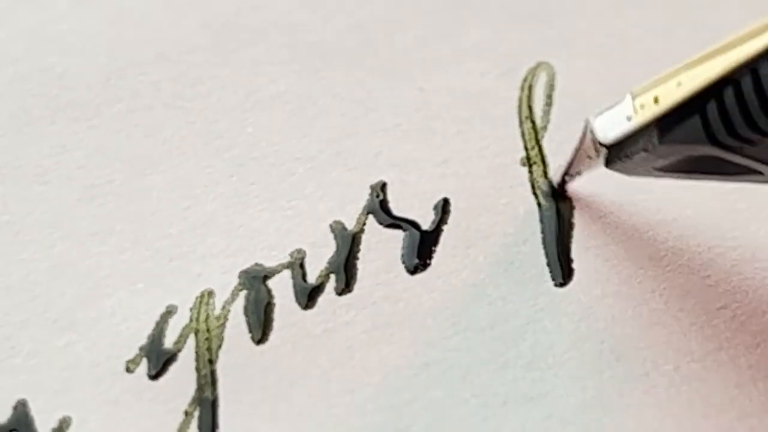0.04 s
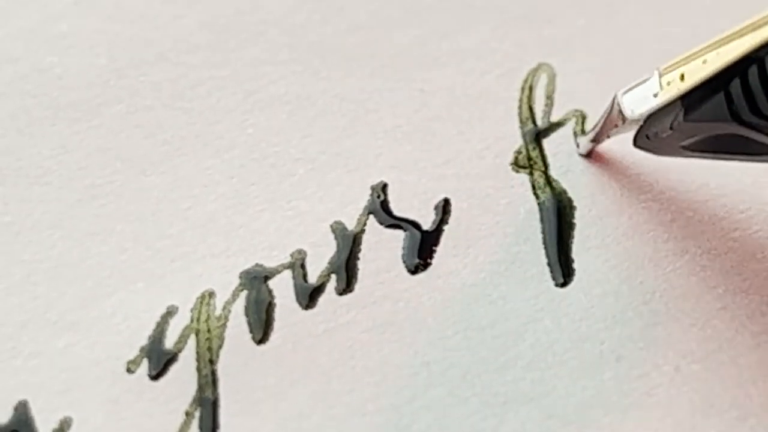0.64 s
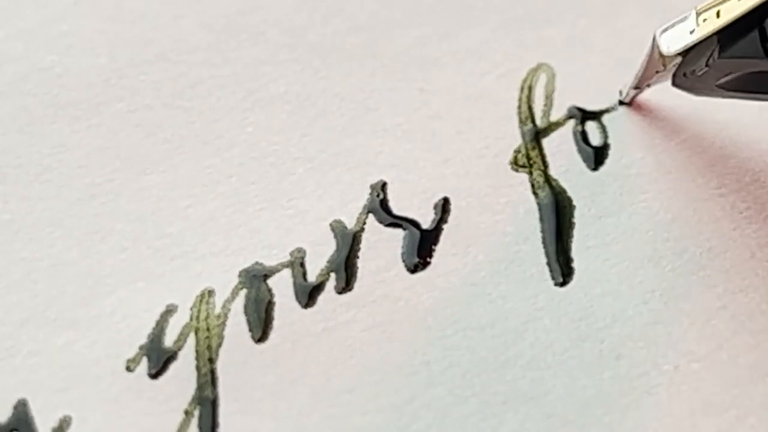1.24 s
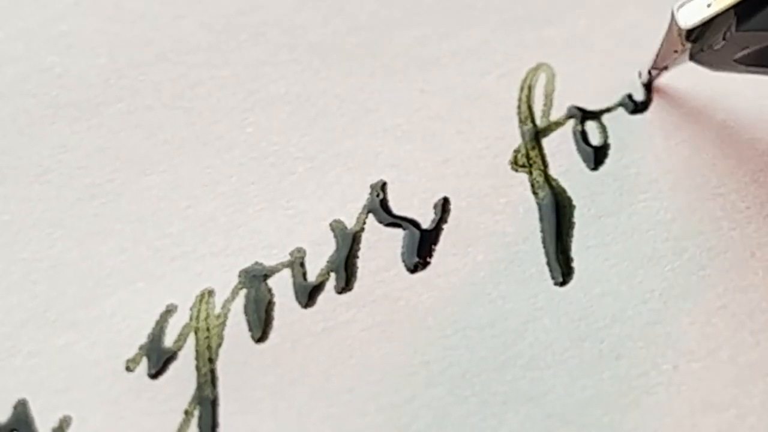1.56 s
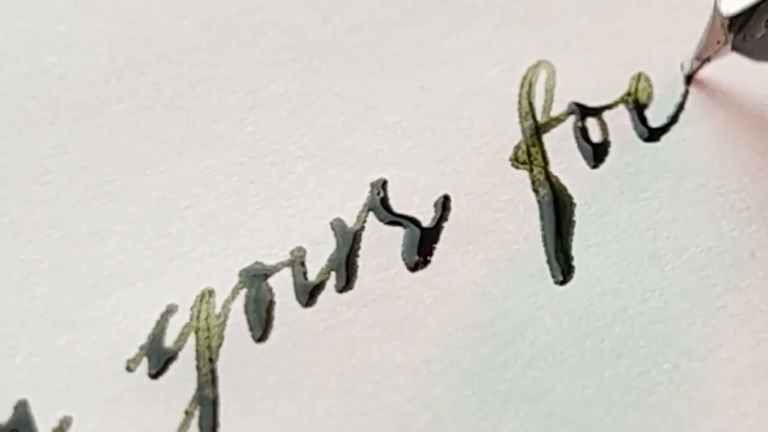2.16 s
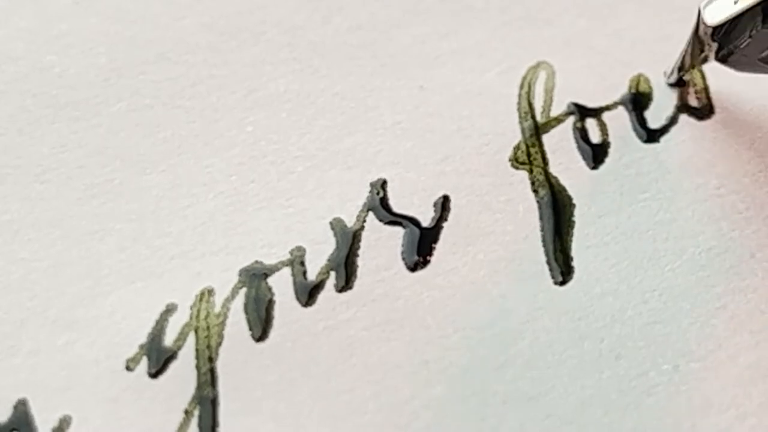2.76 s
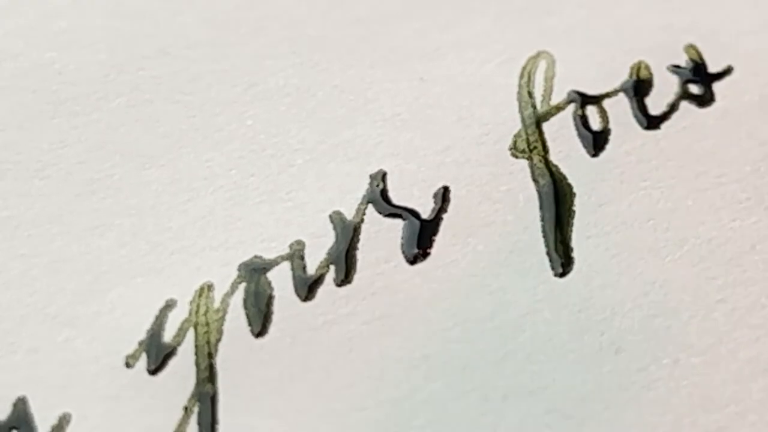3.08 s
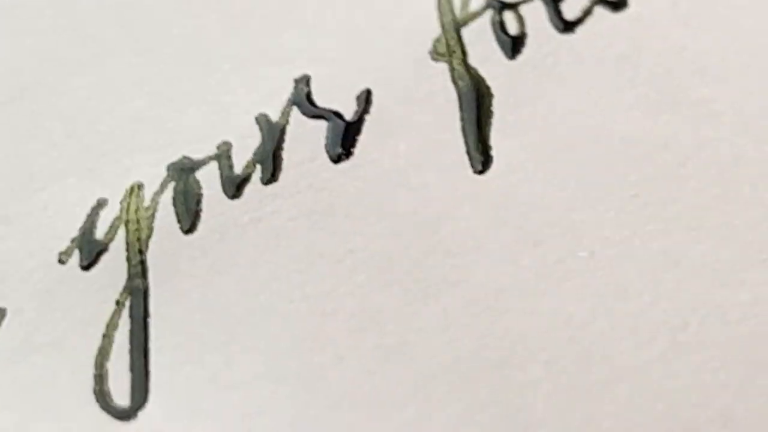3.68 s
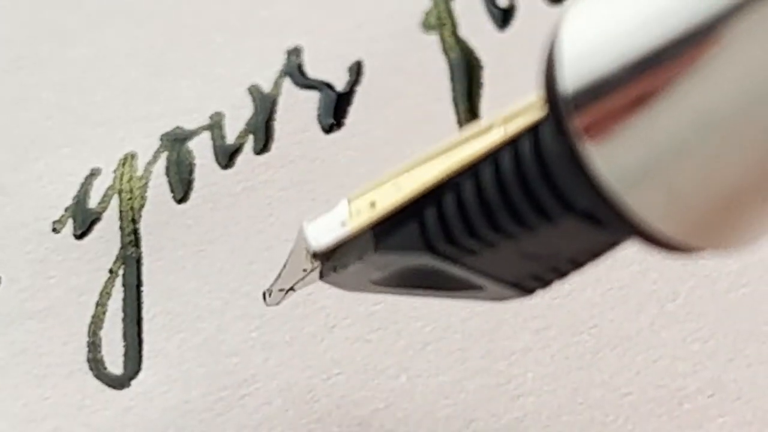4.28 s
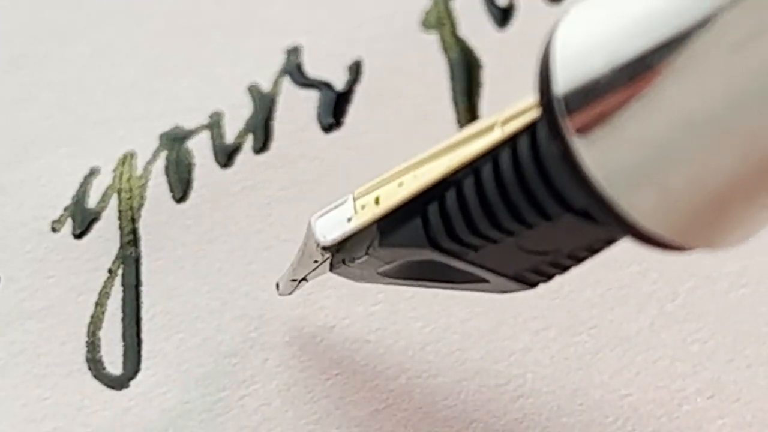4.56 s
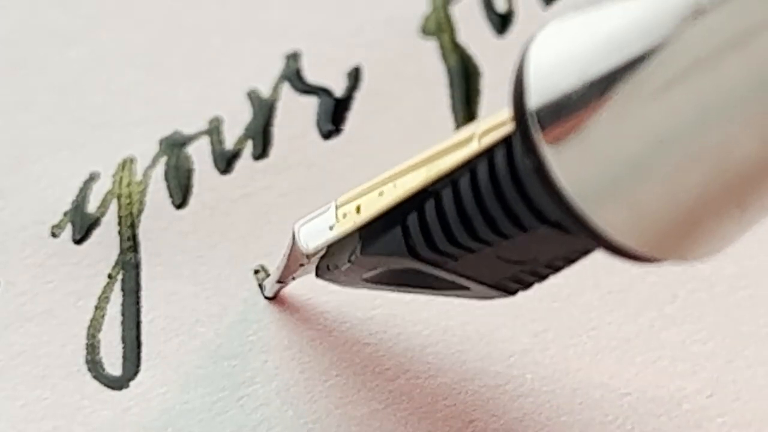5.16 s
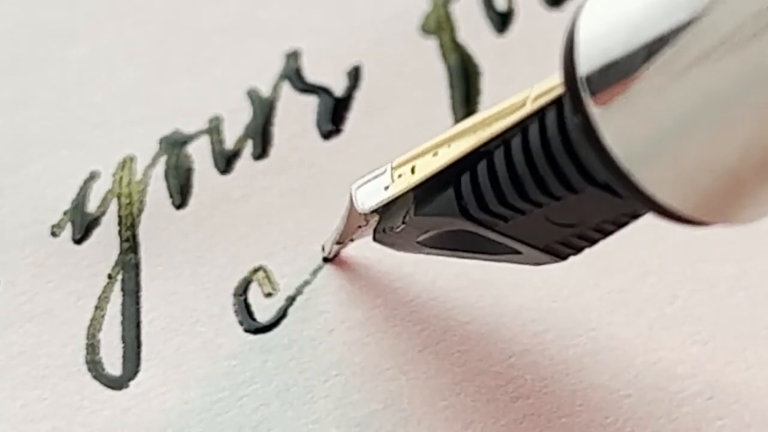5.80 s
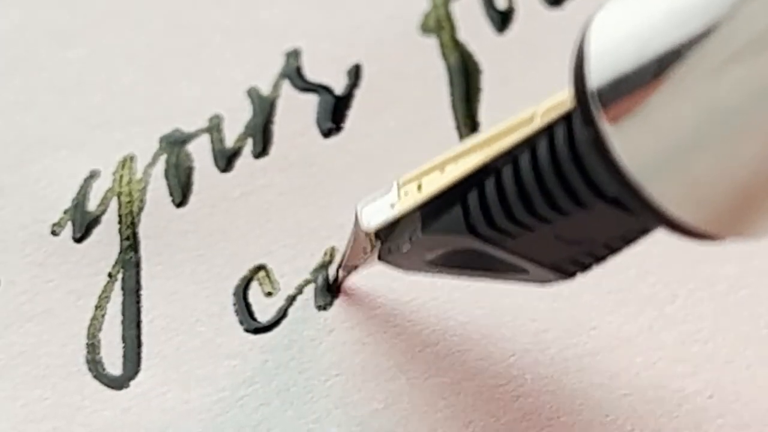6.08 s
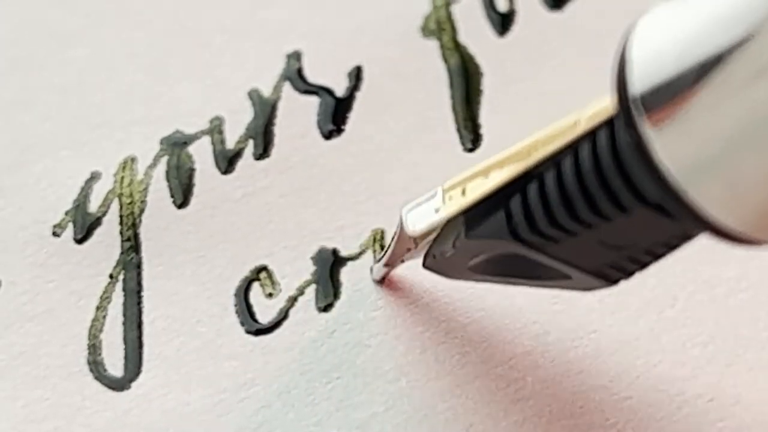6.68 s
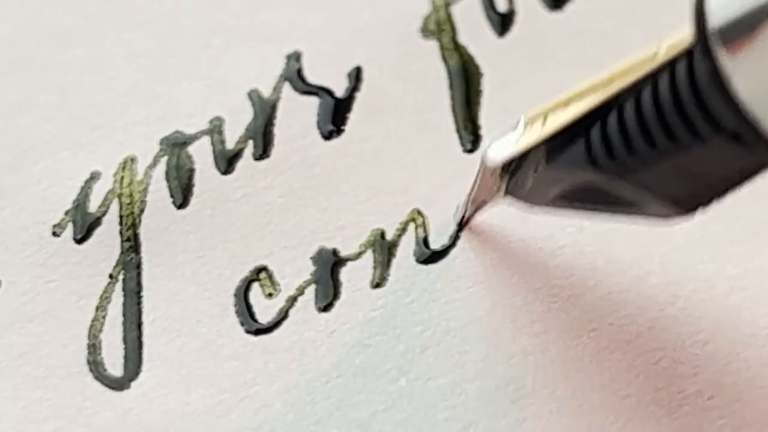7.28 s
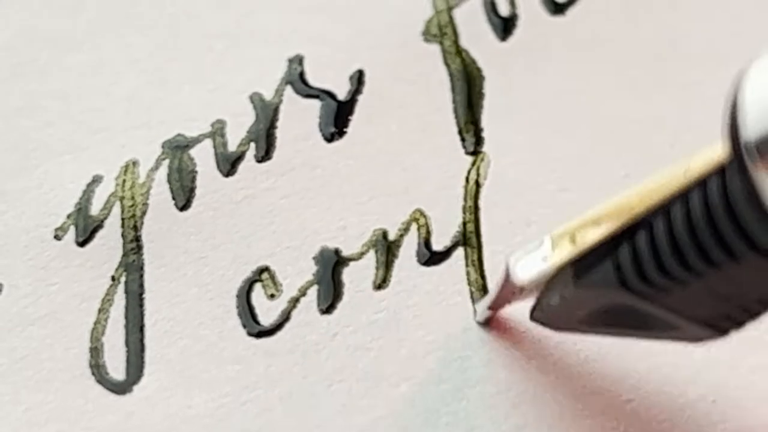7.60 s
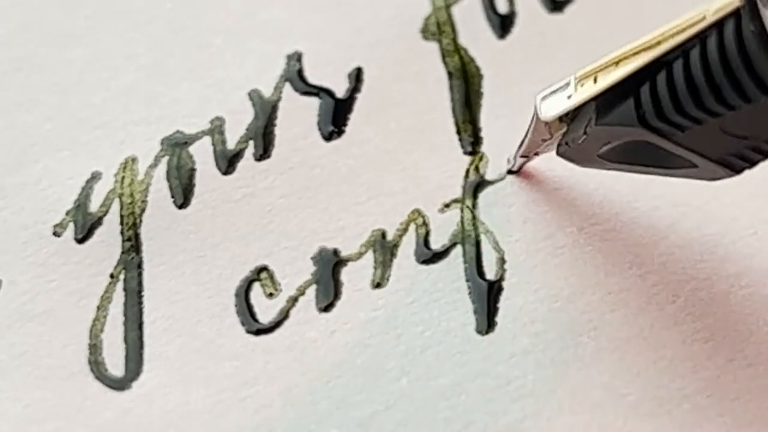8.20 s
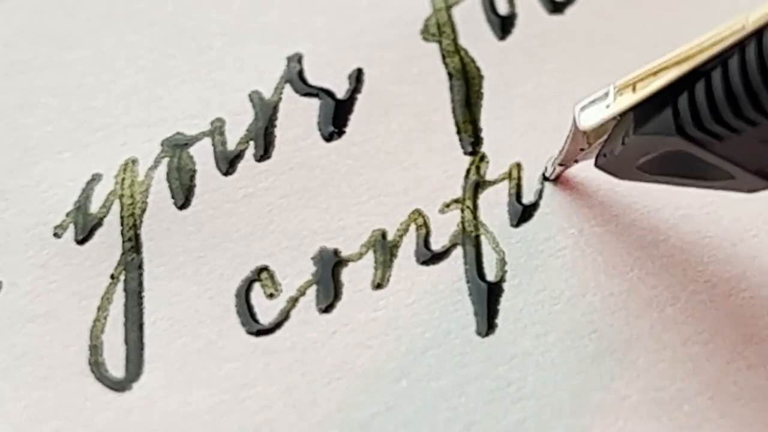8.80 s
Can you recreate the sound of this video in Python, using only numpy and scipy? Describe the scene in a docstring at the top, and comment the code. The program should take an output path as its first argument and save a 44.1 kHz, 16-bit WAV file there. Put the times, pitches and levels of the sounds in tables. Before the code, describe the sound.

A fountain pen writes on textured paper, very close, in a quiet, dry room with faint hiss and low rumble underneath. From the start to about 3 seconds, short rasping downstrokes alternate with softer hissing strokes and brief gaps. The nib ticks near 0.8 and 1.5 seconds, and a stronger scratch with a tiny squeak comes at 2.1. Around 3.4 the hand shifts with a dull rumble, and the sheet slides with a bright swish until 3.9. The hand settles softly at about 4.3. Faint touches of the nib follow, and writing resumes from 5.4 seconds, with scratches and ticks near 6.1, 6.8 and 7.2 and low hand rubbing around 6.4 and 8.1. The sharpest tick lands at 7.7 with a firm rasp. Tiny squeaks dot the later strokes, and a last scratch and tick come at 9 seconds.

```python
"""A flexible fountain pen writes two words on textured paper, close by in a quiet room.
Friction is the exciting force: fibres snap past the nib, and the resonances of pen and pad colour it.
Pressed downstrokes rasp and ring, light upstrokes hiss, and the nib ticks, jerks and squeaks.
Between strokes the hand shifts with a dull rumble, and once the sheet slides along the desk.
A faint hiss and a low murmur lie underneath."""
import sys
import numpy as np
from scipy import signal
from scipy.fft import rfft, irfft, next_fast_len
from scipy.io import wavfile

SR = 44100
rng = np.random.default_rng(int(sys.argv[2]) if len(sys.argv) > 2 else 0)


def wrap_up_sound(samples):
    """Save the sound to the file named by the first command line argument, as 16-bit audio."""
    columns = np.atleast_2d(samples).T
    # keep every value between -1 and 1, then stretch to whole-number steps
    tamed = np.clip(columns, -1, 1)
    steps = np.round(tamed * 32767).astype(np.int16)
    wavfile.write(sys.argv[1], SR, steps)


N = 399096
SIZE = 2 * next_fast_len(N // 2 + SR // 2)
HZ = np.maximum(np.arange(SIZE // 2 + 1) * SR / SIZE, 1)
TIME = np.arange(N) / SR
AGE = TIME[:SR]   # time since the onset of an event
LOW_BAND, PAD_BAND, NIB_BAND = (70, 250), (900, 3000), (4000, 9000)   # reference bands for levels, f/Hz

# Spectral envelopes of noise: f/Hz, relative level/dB
AIR_SPECTRUM = [(400, 14.5), (620, 17.5), (1000, 8.5), (1500, 5), (2200, 6.5), (4000, 1), (8000, 1),
                (10000, -5.5), (12300, -2.5), (13500, -16.5)]
MURMUR_SPECTRUM = [(36, 0), (52, 9.5), (75, 3), (110, 2), (200, -4.5), (420, -13.5)]
SHEET_SPECTRUM = [(700, -10), (2000, -9.5), (3600, -19.5), (5200, 4.5), (8500, -1), (9500, -6.5),
                  (13000, -11), (15200, -13)]
SKIMMED_PAD_SPECTRUM = [(70, 22.5), (130, 19), (300, 15.5), (420, 8.5), (600, 6.5), (1100, -8.5),
                        (1400, -2), (2500, 0), (3300, -8.5), (5000, -76.5)]
NIB_SPECTRUM_WORD_1 = [(3300, -15.5), (4200, -11.5), (5000, -2), (5600, 4.5), (6400, -20), (7000, -11.5),
                       (8400, -19), (9200, -24), (10200, -20.5), (15200, -25)]
NIB_SPECTRUM_WORD_2 = [(3000, 0), (4300, -4), (5300, 6), (7200, 7), (8500, -3.5), (9300, -6.5), (10500, -3),
                       (12000, -6.5), (13500, -17.5), (15200, -10.5)]
# Normal modes of the desk, of pen and pad, and of the nib: f/Hz, bandwidth/Hz, relative level/dB
DESK_MODES_SHIFTING = [(53.4, 7.9, -7.5), (94.5, 20, -7.5), (135.5, 9.5, 0), (162, 110, -18),
                       (200.8, 21.2, -11.5)]
DESK_MODES_SETTLING = [(99.3, 11.2, 0), (153, 37, -13), (213, 22, -7.5)]
PEN_PAD_MODES = [(139, 92, 5), (298, 39, 10), (431.5, 54, -1.5), (555, 140, -3), (780, 150, -7),
                 (1049, 33, -8.5), (1402, 53, -8.5), (1830, 200, -7.5), (2086, 210, -5), (2786, 100, -8)]
NIB_MODES_WORD_1 = [(4300, 180, -16.5), (4570, 1140, -1), (5160, 330, 8), (5590, 320, 10), (7340, 310, -25),
                    (7850, 330, -7.5), (10000, 1400, -12), (14800, 3000, -23)]
NIB_MODES_WORD_2 = [(4030, 250, 4), (4540, 680, -62), (5470, 840, 7.5), (6960, 340, 2.5), (8240, 540, -0.5),
                    (9700, 570, -5), (11900, 720, -13), (15000, 1800, -12)]
# Phase lead of the left channel over the right: f/Hz, phase/rad
PHASE_LEAD = [(20, 0), (850, .4), (1150, -.6), (1750, -.3), (2900, .5), (5000, .4), (6200, 0), (8650, 0),
              (9100, -1.5), (10150, -np.pi), (11800, -2 * np.pi), (12500, -2 * np.pi), (13650, -3 * np.pi),
              (15300, -4 * np.pi)]

# Event levels below are relative within each column.
# Shifts of the hand: t/s, duration/s, rumble level/dB, rub level/dB, initial upper edge of the rub f/Hz
HAND_MOVES = [(2.654, 0.075, -49.5, -62, 200), (3.407, 0.24, -38, -52.5, 344),
              (6.379, 0.31, -36, -43.5, 300), (7.489, 0.14, -50.5, -50.5, 510),
              (8.087, 0.29, -37, -46.5, 447)]
# Envelope of the sliding sheet: t/s, level/dB
SHEET_ENVELOPE = [(3.485, -87), (3.497, -44), (3.577, -63), (3.671, -53), (3.885, -79), (3.9, -92)]
# The nib lands or catches on a fibre: t/s, pad level/dB, nib level/dB
NIB_IMPACTS = [(0.786, -31, -47), (0.802, -32, -38), (0.809, -31, -49), (1.526, -26.5, -36),
               (2.917, -44.5, -40.5), (5.428, -42, -51), (6.081, -26, -36), (6.832, -25.5, -38.5),
               (6.859, -50, -44), (7.238, -41, -53), (7.725, -23.5, -36.5), (7.738, -16, -13.5),
               (9.017, -33, -40)]
# The nib jerks free of a fibre: t/s, level/dB
NIB_JERKS = [(.217, -63), (0.596, -62.5), (0.623, -64), (0.648, -62.5), (0.694, -55.5), (1.028, -59),
             (1.976, -60.5), (2.003, -61), (5.424, -57), (5.605, -55.5), (5.914, -59), (6.327, -64),
             (6.639, -62.5), (6.674, -59.5), (6.705, -62.5), (7.113, -59.5), (7.493, -58), (7.646, -51.5),
             (8.33, -55.5)]
# Peaks of the squeaks: t/s, level/dB
NIB_SQUEAKS = [(2.127, -43.5), (4.831, -70), (5.187, -67), (5.622, -56), (6.87, -55.5), (7.295, -38.5),
               (7.776, -42.5), (8.522, -50), (9.03, -39.5)]
# Light strokes: t/s, duration/s, pad level/dB, nib level/dB, bass lift/dB
LIGHT_STROKES = [(0.032, 0.078, -68.5, -55.5, 6.5), (0.125, 0.05, -70.5, -69.5, -14),
                 (0.242, 0.1, -86, -70.5, 3.0), (0.577, 0.18, -71, -66.5, 6),
                 (0.852, 0.072, -91, -68.0, -4.0), (0.988, 0.081, -75.5, -66, -2),
                 (1.412, 0.036, -77, -73.5, -3), (1.82, 0.024, -72, -70, -12),
                 (1.845, 0.03, -68.5, -65.5, -7.5), (1.895, 0.025, -71, -69, -3),
                 (1.927, 0.06, -71.5, -67.5, 4), (1.977, 0.09, -59.5, -63.5, -12),
                 (2.029, 0.088, -67.5, -87, 4), (2.147, 0.064, -67.5, -70, 1.5),
                 (2.339, 0.17, -67.5, -60.5, 3.5), (2.571, 0.081, -76.5, -69.5, 7.5),
                 (2.645, 0.091, -72, -65, 3.5), (2.856, 0.042, -74, -69, 3),
                 (2.893, 0.088, -65, -60.5, 4.5), (4.798, 0.066, -75.5, -81.5, -21),
                 (5.029, 0.075, -78, -74.5, -22), (5.172, 0.051, -73.5, -77, 0),
                 (5.377, 0.16, -65.5, -64.5, 2.5), (5.68, 0.078, -69, -75.5, -25),
                 (5.896, 0.11, -63.5, -64, 1), (6.298, 0.11, -70.5, -71, -7),
                 (6.611, 0.16, -69.0, -73.5, 3), (7.049, 0.078, -65, -69, -12),
                 (7.102, 0.11, -74, -79, 6.5), (7.468, 0.22, -57.5, -54.5, 2.5),
                 (7.929, 0.043, -64, -65, -0.5), (7.982, 0.16, -76, -76.5, -5),
                 (8.264, 0.14, -64.5, -63, -17), (8.789, 0.17, -71, -73, 4.5)]
# Pressed strokes: t/s, rise/s, decay/(dB/s), pad level/dB, nib level/dB, bass lift/dB
PRESSED_STROKES = [ (-0.012, 0.016, 283, -45, -43, 0.5), (0.199, .026, 478, -55, -53.5, 3.5),
                   (0.779, .030, 310, -50, -49, 1), (1.511, 0.028, 382, -56, -49, 6),
                   (2.092, 0.031, 556, -39.5, -41.5, -8.5), (2.937, 0.013, 404, -60, -57, 6.5),
                   (5.577, 0.052, 470, -59, -55, 5.5), (6.068, 0.026, 326, -54.5, -53, 8),
                   (6.808, 0.06, 330, -50, -53.5, 1.5), (7.24, 0.073, 287, -49, -48, 0.5),
                   (7.716, 0.036, 196, -46.5, -45, 0), (8.488, 0.031, 293, -50, -52.5, 2),
                   (9.003, 0.028, 404, -43, -47.5, -7)]


def from_db(db):
    """Amplitude ratio of a level in decibels."""
    return 10 ** (np.asarray(db) / 20)


def drift(corner_hz):
    """Random fluctuation: low-passed Gaussian noise of unit variance."""
    slow = irfft(rfft(rng.standard_normal(SIZE)) / (1 + (HZ / corner_hz) ** 2))[:N]
    return slow / slow.std()


def spectrum(points):
    """Magnitude response through the points, falling 24 dB per octave beyond both ends."""
    hz, db = np.transpose(points)
    skirts = np.minimum(np.minimum(HZ / hz[0], hz[-1] / HZ), 1) ** 4
    return from_db(np.interp(np.log(HZ), np.log(hz), db)) * skirts


def resonances(modes):
    """Modal superposition: steep-sided modes add in power, with a roll-off above the highest."""
    power = sum(from_db(db) ** 2 / (1 + ((HZ ** 2 - hz ** 2) / (0.79 * HZ * width)) ** 2) ** 1.27
                for hz, width, db in modes)
    return np.sqrt(power / (1 + (HZ / (1.15 * modes[-1][0])) ** 12))


def response(gain, band):
    """Causal, minimum-phase transfer function; unit white noise leaves it with rms 1 in the band."""
    gain = gain / np.sqrt(np.mean(gain ** 2 * (HZ > band[0]) * (HZ < band[1])))
    cepstrum = irfft(np.log(gain + 1e-4))
    cepstrum[1:SIZE // 2] *= 2
    cepstrum[SIZE // 2 + 1:] = 0
    return np.exp(rfft(cepstrum))


def through(force, body):
    """Linear response: the spectrum of the force times the transfer function of the body."""
    return irfft(rfft(force, SIZE) * body)[:N]


def superpose(starts, shapes, db):
    """Superposition of one-second envelopes, each at its own onset and level."""
    out = np.zeros(N + 3 * SR)
    for start, shape, gain in zip(starts, shapes, from_db(db)):
        at = SR + int(start * SR)
        out[at:at + SR] += gain * shape
    return out[SR:SR + N]


def friction(per_s, size_db, tooth_db, tooth_hz):
    """Friction as shot noise of rms 1: random snaps, in clumps set by the tooth of the surface."""
    snaps = rng.random(N) < per_s / SR
    sizes = from_db(size_db * np.minimum(rng.exponential(1, N), 4)) * rng.choice([-1, 1], N)
    force = snaps * sizes * from_db(tooth_db * np.tanh(drift(tooth_hz)))
    return force / force.std()


def background(air_db, murmur_db, waver_db):
    """Ambient noise: a steady hiss over a low rumble with random amplitude modulation."""
    air = through(rng.standard_normal(N), response(spectrum(AIR_SPECTRUM), NIB_BAND))
    unrest = from_db(murmur_db + waver_db * drift(5.5))
    murmur = through(rng.standard_normal(N) * unrest, response(spectrum(MURMUR_SPECTRUM), LOW_BAND))
    return from_db(air_db) * air + murmur


def room(sound, t60, wet_db, wall_hz, low_hz):
    """Reverberation: a diffuse midrange field decays exponentially, with its own tail on each side."""
    tails = rng.standard_normal((2, N)) * from_db(-60 * TIME / t60) * (TIME > .004)
    tails /= np.sqrt(np.sum(tails ** 2, axis=1, keepdims=True))
    walls = 1 / (1 + 1j * HZ / wall_hz) / (1 - 1j * low_hz / HZ)
    return from_db(wet_db) * np.array([through(sound, rfft(tail, SIZE) * walls) for tail in tails])


def drag(length_s, sag_db_per_s, attack_s=0.05, release_db_per_s=82):
    """Friction noise follows the hand's speed: a quick rise, an exponential sag, then a faster decay."""
    sag = sag_db_per_s * np.maximum(AGE - attack_s, 0)
    release = release_db_per_s * np.maximum(AGE - length_s, 0)
    return np.minimum(AGE / attack_s, 1) ** 1.02 * from_db(-sag - release)


def rubbing(lowest_hz=166.8, fall_octaves_per_s=3):
    """Sliding friction of skin on paper, in third octaves; the bandwidth shrinks as the hand slows."""
    starts, lengths, _, levels, edges = np.transpose(HAND_MOVES)
    moves = np.array([drag(length, sag_db_per_s=19) for length in lengths])
    edge_hz = edges[:, None] * 2 ** (-fall_octaves_per_s * AGE)
    step, out = 2 ** (1 / 3), 0
    for low in lowest_hz * step ** np.arange(8):
        bandpass = signal.butter(2, [low, low * step], "band", fs=SR, output="sos")
        band = signal.sosfilt(bandpass, rng.standard_normal(N))
        out = out + band / band.std() * superpose(starts, moves / (1 + (low / edge_hz) ** 5.5), levels)
    return out


def hand(settle_at_s=4.345, settle_db=-44):
    """Forced vibration: soft slips of skin drive the desk's low modes as the hand shifts or settles."""
    starts, lengths, levels, _, _ = np.transpose(HAND_MOVES)
    shifting = superpose(starts, [drag(length, sag_db_per_s=26) for length in lengths], levels)
    settling = superpose([settle_at_s], [drag(length_s=.29, sag_db_per_s=33)], [settle_db])
    slips = friction(per_s=3700, size_db=-3.5, tooth_db=1.0, tooth_hz=29.7)
    rumble = through(slips * shifting, response(resonances(DESK_MODES_SHIFTING), LOW_BAND))
    settle = through(slips * settling, response(resonances(DESK_MODES_SETTLING), LOW_BAND))
    return rumble + rubbing() + settle


def sheet(gain_db):
    """Sliding friction of paper on paper: dense, small slips merge into a smooth, bright hiss."""
    force = friction(per_s=26000, size_db=1.5, tooth_db=2.3, tooth_hz=60)
    speed = from_db(np.interp(TIME, *np.transpose(SHEET_ENVELOPE), left=-np.inf, right=-np.inf))
    return from_db(gain_db) * through(force * speed, response(spectrum(SHEET_SPECTRUM), NIB_BAND))


def edge_reflection(force, echo, lag_s):
    """Comb filtering: the echo from the pad's edge changes its delay as the contact point wanders."""
    lag = lag_s * (1 + .5 * np.tanh(drift(2.6)))
    return (force + echo * np.interp(TIME - lag, TIME, force)) / np.hypot(1, echo)


def on_pad(force, starts, speeds, pad_db, bass_db, body, shelf_hz=700):
    """Forced vibration of the pad; a low shelf gives each stroke more or less bass."""
    plain = superpose(starts, speeds, pad_db)
    lifted = superpose(starts, speeds, pad_db + bass_db)
    bass = through(force * (lifted - plain), body / (1 + 1j * HZ / shelf_hz))
    return through(force * plain, body) + bass


def on_nib(force, speed, first, second, second_word_s=4.0, hard_db=-46.5, bite=0.35):
    """Nonlinear drive: harder strokes are brighter; the pen's angle gives each word its own colour."""
    drive = force * speed
    hardness = speed / (speed + from_db(hard_db))
    drive = drive + bite * hardness * np.convolve(drive, [-1, 2, -1], "same")   # treble emphasis
    later = TIME > second_word_s
    first_word = through(drive * ~later, response(first, NIB_BAND))
    return first_word + through(drive * later, response(second, NIB_BAND))


def ticks(pad, pad_db, nib_db, scuff, scuff_s, spread_s, low_hz=130):
    """Impact excitation: each blow of the tip, with a brief scuff, knocks the pad and rings the nib."""
    starts, knock_db, ring_db = np.transpose(NIB_IMPACTS)
    tapped_pad = pad / (1 - 1j * low_hz / HZ)   # the small, hard tip hardly excites the bass
    nib = response(resonances(NIB_MODES_WORD_2) / (1 + (HZ / 8500) ** 4), NIB_BAND)
    # Dispersion: bending waves are slower at low frequency, so each tick is a falling chirp.
    delay_s = spread_s / np.sqrt(1 + HZ / 1000)
    chirp = np.exp(-2j * np.pi * np.cumsum(delay_s) * SR / SIZE)
    onsets, age = np.round(starts * SR).astype(int), TIME[:SR // 50]
    blows = (age == 0) + scuff * rng.standard_normal((len(starts), len(age))) * np.exp(-age / scuff_s)
    out = 0
    for body, levels in ((tapped_pad, knock_db + pad_db), (nib, ring_db + nib_db)):
        force = np.zeros(SIZE)
        for at, blow, db in zip(onsets, blows, levels):
            force[at:at + len(age)] += from_db(db) * blow / np.linalg.norm(blow)
        out = out + through(force, body * chirp / np.abs(irfft(body * chirp)).max())
    return out


def jerks(peak_s, pad_db, nib_db):
    """Transient slip: freed from a fibre, the tip shoots forward in a decaying spurt of grains."""
    starts, levels = np.transpose(NIB_JERKS)
    spurt = AGE / peak_s * np.exp(1 - AGE / peak_s)
    force = friction(per_s=12000, size_db=1.0, tooth_db=1.0, tooth_hz=300)
    speed = superpose(starts, [spurt] * len(starts), levels)
    push = through(force * speed, response(spectrum(SKIMMED_PAD_SPECTRUM), PAD_BAND))
    hiss = on_nib(force, speed, spectrum(NIB_SPECTRUM_WORD_1), spectrum(NIB_SPECTRUM_WORD_2))
    return from_db(pad_db) * push + from_db(nib_db) * hiss


def squeaks(pad, slip_hz, jitter, width_s, nib_db):
    """Stick-slip oscillation: a brief, rough train of slips at a rate close to a mode of the pen."""
    cycles = np.cumsum(slip_hz * (1 + jitter * drift(308))) / SR
    slips = np.diff(np.floor(cycles), prepend=0)
    nib = response(resonances(NIB_MODES_WORD_2), NIB_BAND)
    buzz = through(slips - slips.mean(), pad + from_db(nib_db) * nib)
    swells = sum(from_db(db) / np.cosh(np.clip((TIME - t) / width_s, -20, 20)) for t, db in NIB_SQUEAKS)
    return buzz / buzz.std() * swells


def hairlines(pad_db, nib_db):
    """Light sliding friction: the tip skims in a half sine of speed, hissing and softly driving the pad."""
    starts, lengths, pads, nibs, basses = np.transpose(LIGHT_STROKES)
    arches = [np.sin(np.pi * np.minimum(AGE / length, 1)) for length in lengths]
    force = friction(per_s=5000, size_db=3.3, tooth_db=4.3, tooth_hz=70)
    pad = response(spectrum(SKIMMED_PAD_SPECTRUM), PAD_BAND)
    push = on_pad(force, starts, arches, pads + pad_db, basses, pad)
    speed = superpose(starts, arches, nibs + nib_db)
    return push + on_nib(force, speed, spectrum(NIB_SPECTRUM_WORD_1), spectrum(NIB_SPECTRUM_WORD_2))


def downstrokes(pad, pad_db, nib_db, rise_power=1.37):
    """Friction-driven resonance: spread tines dig in, speed up and brake, shaking both pad and nib."""
    starts, rises, decays, pads, nibs, basses = np.transpose(PRESSED_STROKES)
    surges = [np.minimum(AGE / rise, 1) ** rise_power * from_db(-decay * np.maximum(AGE - rise, 0))
              for rise, decay in zip(rises, decays)]
    force = friction(per_s=9000, size_db=4.5, tooth_db=4.0, tooth_hz=173)
    force = edge_reflection(force, echo=0.54, lag_s=0.0014)
    rasp = on_pad(force, starts, surges, pads + pad_db, basses, pad)
    speed = superpose(starts, surges, nibs + nib_db)
    return rasp + on_nib(force, speed, resonances(NIB_MODES_WORD_1), resonances(NIB_MODES_WORD_2))


def scene():
    """Superposition: the direct sound of pen, hand, sheet and background, plus its reverberation."""
    pad = response(resonances(PEN_PAD_MODES), PAD_BAND)
    pen = ticks(pad, pad_db=-3.5, nib_db=-1.0, scuff=0.14, scuff_s=0.0012, spread_s=0.00199)
    pen += downstrokes(pad, pad_db=-0.24, nib_db=-1.03)
    pen += hairlines(pad_db=-0.8, nib_db=1.3)
    pen += jerks(peak_s=0.0032, pad_db=-10.5, nib_db=1.4)
    pen += squeaks(pad, slip_hz=1029, jitter=0.046, width_s=0.00474, nib_db=-20)
    direct = pen + hand() + sheet(gain_db=-4.0) + background(air_db=-82.5, murmur_db=-64.5, waver_db=2.0)
    return direct + room(direct, t60=0.16, wet_db=-8, wall_hz=1790, low_hz=200)


def record(dry):
    """Interchannel phase shift, greatest in the treble, widens the sound; a low-pass cuts the top."""
    phase = np.interp(HZ, *np.transpose(PHASE_LEAD))
    wide = np.array([through(channel, np.exp(.5j * side * phase)) for channel, side in zip(dry, (1, -1))])
    lowpass = signal.ellip(10, .2, 80, 15900, fs=SR, output="sos")
    return signal.sosfilt(lowpass, wide)


dry = scene()
out = record(dry)
wrap_up_sound(out)
```